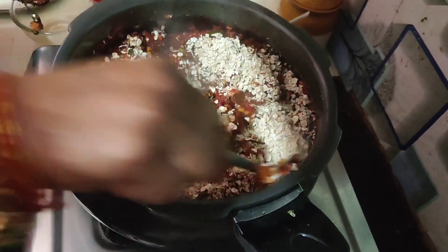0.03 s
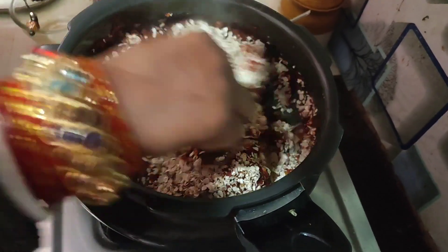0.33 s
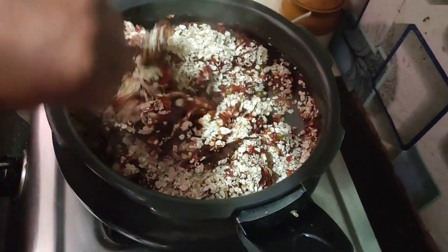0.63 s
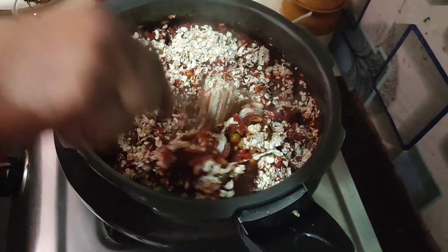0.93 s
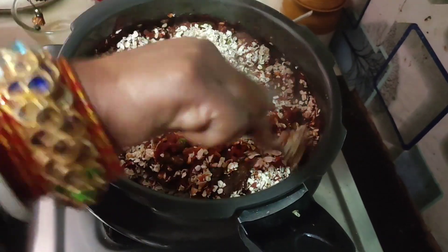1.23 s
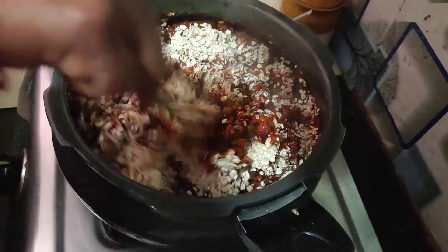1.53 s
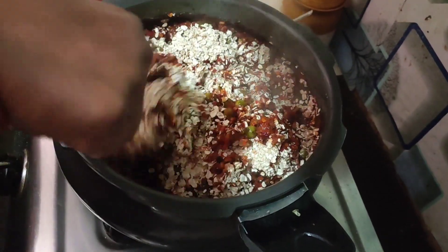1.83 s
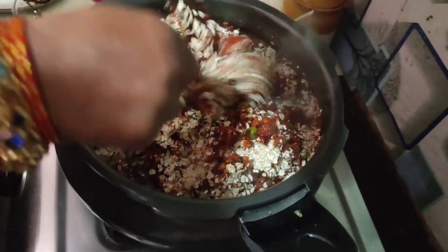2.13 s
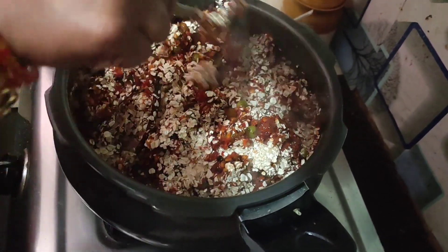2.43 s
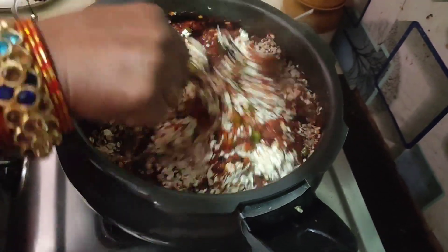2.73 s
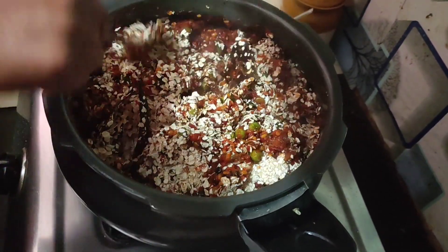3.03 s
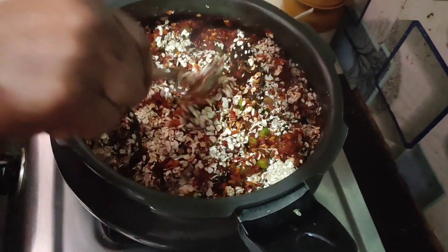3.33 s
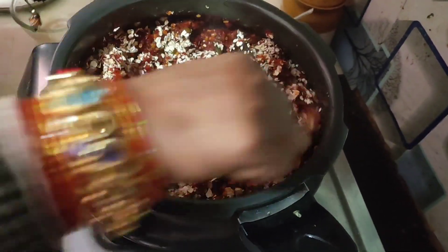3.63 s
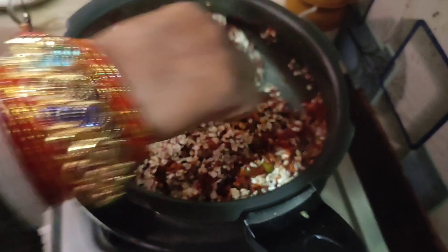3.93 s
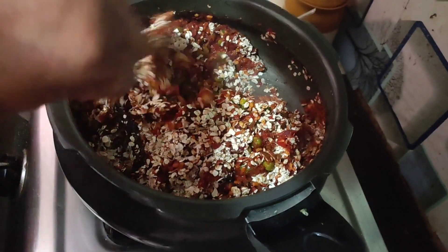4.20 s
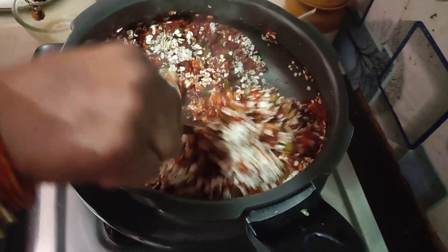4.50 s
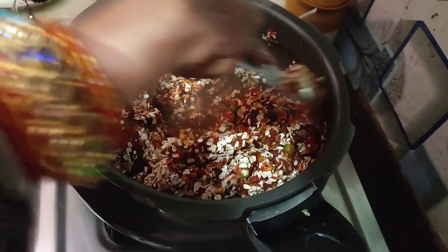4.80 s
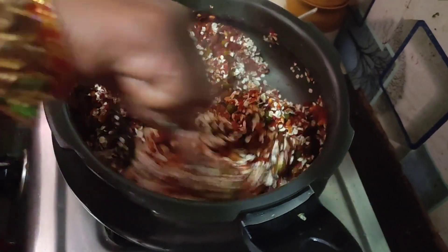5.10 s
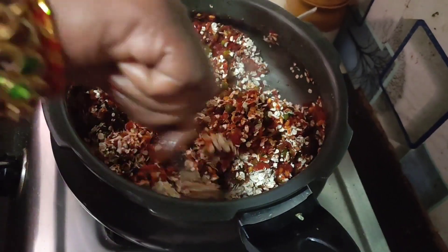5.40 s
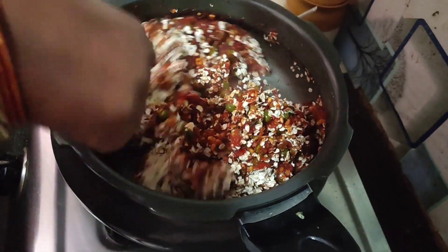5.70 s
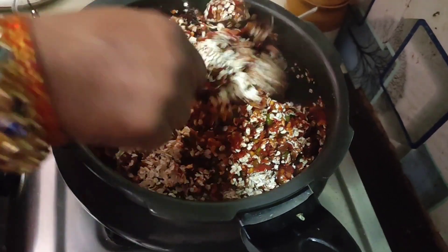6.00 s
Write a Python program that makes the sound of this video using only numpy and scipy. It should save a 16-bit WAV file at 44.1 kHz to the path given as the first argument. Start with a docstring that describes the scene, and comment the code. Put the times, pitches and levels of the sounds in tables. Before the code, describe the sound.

Close above a pot in a home kitchen, grainy food sizzles softly while a metal spoon turns it over. Bright, briefly ringing clinks and short, raspy scrapes come at uneven intervals, strongest at the start and just before two seconds. Duller knocks follow in the middle, then more clinks and a longer scrape near the end. A low rumble sits underneath.

```python
"""A steel spoon knocks and scrapes a heavy metal pot, turning thick, grainy food on a kitchen stove.
Each knock is a short clatter plus the ring of pot and spoon. Each scrape is fast stick-slip over the
bottom or wall, ringing both. Tiny bubbles sizzle faintly, swelling as wet food meets hot metal, over a
low kitchen rumble. Heard from close above the pot, with the right side facing in."""
import sys
import numpy as np
from scipy import signal
from scipy.fft import rfft, irfft
from scipy.io import wavfile

SR = 44100
rng = np.random.default_rng(int(sys.argv[2]) if len(sys.argv) > 2 else 0)


def dump(signal):
    """Clip the signal to [-1, 1] and save it as 16-bit WAV at the path in sys.argv[1]."""
    limited = np.clip(np.atleast_2d(signal).T, -1, 1)
    pcm = np.round(limited * 32767).astype(np.int16)
    wavfile.write(sys.argv[1], SR, pcm)


N = 271215
T = np.arange(N) / SR


def amp(db):
    return 10 ** (np.asarray(db) / 20)


def unit_rms(x):
    return x / np.sqrt(np.mean(x ** 2) + 1e-20)


def curve_at(points, hz):
    """Interpolate (freq_hz, value) points over log frequency."""
    freq_hz, value = np.transpose(points)
    return np.interp(np.log(hz + 1), np.log(freq_hz + 1), value)


def add(mix, start_s, sound):
    part = mix[..., max(round(start_s * SR), 0):][..., :sound.shape[-1]]
    part += sound[..., :part.shape[-1]]


def colour(x, points, size=4096):
    """Minimum-phase filter through (freq_hz, gain_db) points."""
    log_gain = np.log(amp(curve_at(points, abs(np.fft.fftfreq(size, 1 / SR)))) + 1e-6)
    taps = np.fft.ifft(np.exp(np.conj(signal.hilbert(log_gain)))).real
    return signal.fftconvolve(x, taps[:size // 2])[:len(x)]


def resonate(x, hz, width_hz):
    """Unity-gain resonance; hz may be a curve."""
    carrier = np.exp(2j * np.pi * np.cumsum(hz * np.ones(len(x))) / SR)
    pole = np.exp(-np.pi * width_hz / SR)
    return 2 * (carrier * signal.lfilter([1 - pole], [1, -pole], x / carrier)).real


def nearness(hz, note_hz, reach):
    """Bell curve over log frequency, 1 at the note."""
    return np.exp(-(np.log(hz / np.asarray(note_hz)) / reach) ** 2)


def waver(per_s):
    """Random drift, unit RMS."""
    return unit_rms(np.interp(T * per_s, np.arange(N), rng.standard_normal(N)))


def clicks(per_s, spread_db):
    """Random impulse train, a few of them large."""
    size = amp(spread_db * np.minimum(rng.exponential(1, N), 4))
    return unit_rms(size * rng.choice([-1, 1], N) * (rng.random(N) < per_s / SR))


def reflections(x, t60_s=0.09, size=4096):
    """Dense echoes off pot wall, stove and tiles."""
    echoes = rng.standard_normal(size) * amp(-60 * np.arange(size) / SR / t60_s)
    return signal.fftconvolve(x, echoes / np.linalg.norm(echoes))[:len(x)]


# Left side relative to right: freq_hz, gain_db
LEFT_SHADOW = [(60, 1), (110, -4), (250, -8), (420, -10), (700, -8.5), (1290, -14.5), (2380, -22),
               (4400, -28), (8000, -35.5), (14000, -18)]
# Likeness of the two sides: freq_hz, coherence
COHERENCE = [(30, .65), (100, .94), (300, .9), (700, .5), (1500, .3), (5000, .38), (14000, .35)]


def stereo(direct, diffuse, left_db, delay_samples=4):
    """Right gets the direct sound; left is shadowed, slightly late and partly diffuse."""
    size = 2 * len(direct)
    hz = np.fft.rfftfreq(size, 1 / SR)
    right, scatter = rfft([direct, diffuse], size)
    coherence = np.clip(curve_at(COHERENCE, hz), 0, 1)
    shadow = amp(np.minimum(curve_at(LEFT_SHADOW, hz) + left_db, 1))
    delay = np.exp(-2j * np.pi * hz * delay_samples / SR)
    left = shadow * (coherence * delay * right + np.sqrt(1 - coherence ** 2) * scatter)
    return irfft(np.array([left, right]) * 2 / (1 + shadow))[:, :len(direct)]


# Rumble round the stove: freq_hz, gain_db
RUMBLE_EQ = [(20, -9.5), (38, 2.5), (52, -6), (68, 0.5), (100, -13), (140, -8.5), (190, -26.5), (290, -9),
             (600, -49)]
# Kitchen hum: pitch_hz, width_hz, level_db
HUM_TONES = [(92.2, 22.3, -55), (123.1, 7.5, -61), (1104, 10.5, -69)]


def drone(rumble_db=-56):
    """Low rumble with wavering tones of narrow-band noise."""
    rumble = amp(rumble_db) * unit_rms(colour(rng.standard_normal(N), RUMBLE_EQ, size=16384))
    hum = np.zeros(N)
    for hz, width_hz, db in HUM_TONES:
        band = resonate(rng.standard_normal(N), hz, width_hz)
        hum += amp(db) * unit_rms(resonate(band, hz, width_hz))
    return rumble + hum


def kitchen(hiss_db=-75):
    """Drone from all round under faint white hiss."""
    return stereo(drone(), drone(), left_db=-1.6) + amp(hiss_db) * rng.standard_normal((2, N))


# Hollow modes of the pot: pitch_hz, level_db, t60_s
POT_MODES = [(115.8, -7.5, 1), (173.6, -0.5, 0.16), (262.3, 3, 0.54), (443, 4.5, 0.16), (586.6, -1.5, 0.44),
             (667, -2.5, 0.46), (712, 0, 0.3), (760.3, 6.5, 0.28), (936, 4, 0.28), (1060, 2.5, 0.28),
             (1340, -10.5, 0.13)]
# Dull rubbing in the pot: freq_hz, gain_db
GROAN_EQ = [(100, -30), (230, 2), (330, 0.5), (430, 1), (550, -1.5), (900, 0), (1300, 0), (2500, -56)]


def pot_groan(rubbing, ring_db=5):
    """Rubbing noise coloured by the hollow of the pot."""
    modes = sum(amp(db / 2) * resonate(rubbing, hz, 3.7 / t60_s + 8) for hz, db, t60_s in POT_MODES)
    return unit_rms(colour(rubbing + amp(ring_db) * modes, GROAN_EQ))


# Bursting bubbles: freq_hz, gain_db
SIZZLE_EQ = [(450, -18.5), (800, -2.5), (1000, -17.5), (1250, -6), (1500, -0.5), (2500, -5.5), (4000, -4),
             (4500, -0.5), (5400, -3.5), (6500, -3), (8700, -21), (14500, -18.5)]
# Wet food turned onto hot metal: peak_s, swell_db
FOOD_TURNS = [(0.05, 4), (0.45, 7), (0.85, 10.5), (1.22, 5.5), (1.5, 10.5), (2.18, 5.5), (2.78, 9.5),
              (3.22, 10.5), (3.97, 7), (4.481, 6), (5.3, 4), (5.95, 4.5)]


def frying(sizzle_db=-50.5, food_db=-62, half_turn_s=0.12, sizzle_share=0.38, drying_db_per_s=0.34):
    """Bubbles burst and food shifts; both swell at each turn. The sizzle fades as the food dries."""
    swell_db = sum(db * np.exp(-((T - peak_s) / half_turn_s) ** 2) for peak_s, db in FOOD_TURNS)
    flicker_db = 0.61 * waver(per_s=50)
    heat = amp(sizzle_db + sizzle_share * swell_db - drying_db_per_s * T + flicker_db)
    bubbles = heat * unit_rms(colour(clicks(per_s=12000, spread_db=2), SIZZLE_EQ))
    shifting = amp(food_db + swell_db) * pot_groan(rng.standard_normal(N))
    food = bubbles + shifting
    return stereo(food, reflections(food), left_db=3)


# Spoon and pot pressed together: pitch_hz, width_hz, level_db
PRESSED_MODES = [(958, 65, 1.5), (1707, 58, 4.5), (1906, 40, 3.5), (2970, 59, -0.5), (3360, 60, 1),
                 (3732, 47, 5), (4210, 43, 3), (4457, 64, 5), (4683, 74, 7.5), (5100, 96, 2),
                 (5590, 60, 4.5), (6090, 50, 5), (6470, 82, 0.5), (7440, 42, -2.5), (7400, 44, -11)]


def pressed_ring(slips, bend, grip_notes_hz, grip_db=7, damping_hz=8200):
    """Slips ring spoon and pot; modes near the notes of the grip are boosted."""
    ringing = np.zeros(len(slips))
    for hz, width_hz, db in PRESSED_MODES:
        boost_db = grip_db * nearness(hz, grip_notes_hz, reach=0.075).sum()
        ringing += amp(db + boost_db) * resonate(slips, hz * bend, width_hz)
    damping = signal.butter(8, damping_hz, fs=SR, output="sos")
    return unit_rms(signal.sosfilt(damping, ringing))


# Spoon edge dragging through grains: freq_hz, gain_db
RASP_EQ = [(300, -32), (700, -14), (950, -9), (1200, -7), (1800, 1.5), (2300, -0.5), (3000, 2.5),
           (4500, -3), (6400, -2), (7300, -20), (8200, -14), (9500, -28), (14000, -25)]
# Grains being crushed: freq_hz, gain_db
FIZZ_EQ = [(5000, -6), (7400, 1), (8250, 4), (9000, -2.5), (10000, -0.5), (12200, -1), (12850, 8),
           (13400, -4), (14100, -1), (14600, -6)]
# Strokes over bottom or wall:
# start_s, length_s, pressure_db, rise_db, groan_db, fizz_db, grip_low_hz, grip_high_hz
SPOON_STROKES = [(0.172, 0.14, -36, 8, -48, -58, 2990, 5230),
                 (0.278, 0.033, -37, 11, -39, -34.5, 2990, 4230),
                 (0.308, 0.067, -48, 3, -43.5, -66, 1800, 5080),
                 (0.391, 0.014, -40, 3, -51, -40.5, 4200, 6130),
                 (0.538, 0.014, -39.5, -2, -64, -47, 4660, 6550),
                 (0.876, 0.045, -27.5, 3.5, -54, -53, 1630, 6950),
                 (1.841, 0.22, -28, 6, -47.5, -51.5, 4620, 6420),
                 (3.74, 0.056, -40.5, 10, -55, -60, 1720, 4440),
                 (3.785, 0.05, -37, -2, -45, -50, 4360, 5600), (3.834, 0.049, -35, 6, -50, -67, 1720, 3760),
                 (4.507, 0.053, -28, 2, -47, -53, 1630, 4100),
                 (5.018, 0.086, -36, 13.5, -40, -53.5, 950, 4100),
                 (5.138, 0.073, -34.5, -1, -41, -49.5, 950, 4100),
                 (5.468, 0.065, -33.5, 13.5, -42.5, -59, 1820, 2970),
                 (5.538, 0.14, -37.5, 5, -41.5, -64, 1820, 4500),
                 (5.64, 0.24, -28.5, 1.5, -52.5, -50, 3740, 4700),
                 (5.797, 0.018, -28.5, 2, -54, -62, 4620, 4650)]


def spoon_scrapes(metal_trim_db=-2.5, groan_trim_db=-1, ring_db=9, bite_s=0.018, release_t60_s=0.15,
                  arch_db=5.5, fizz_arch_db=9.5, groan_fade_db_per_s=57):
    """The edge catches and slips very fast, on grains and on metal. A stroke bites, swells, lets go."""
    judder = amp(0.76 * waver(per_s=140))
    crushing, slips = (clicks(per_s=6000, spread_db=2.5) * judder for _ in range(2))
    rasp = colour(crushing, RASP_EQ)
    fizz = unit_rms(colour(crushing, FIZZ_EQ))
    groan = pot_groan(slips)
    bend = 1 + 0.008 * waver(per_s=60)  # the spoon rocks on the grains
    out = np.zeros(N)
    for start_s, length_s, pressure_db, rise_db, groan_db, fizz_db, *grip_notes_hz in SPOON_STROKES:
        span = (T > start_s) & (T < start_s + length_s + release_t60_s)
        t = T[span] - start_s
        along = np.minimum(t / length_s, 1) - 0.5
        ends = (2 * along) ** 2  # 0 mid-stroke, 1 at either end
        contact = np.minimum(t / bite_s, 1) * amp(-60 * np.maximum(t - length_s, 0) / release_t60_s)
        ringing = pressed_ring(slips[span], bend[span], grip_notes_hz)
        metal = unit_rms(unit_rms(rasp[span]) + amp(ring_db) * ringing)
        metal_gain = amp(metal_trim_db + pressure_db + rise_db * along - arch_db * ends)
        groan_gain = amp(groan_trim_db + groan_db - groan_fade_db_per_s * t)
        fizz_gain = amp(fizz_db - fizz_arch_db * ends)
        out[span] += contact * (metal_gain * metal + groan_gain * groan[span] + fizz_gain * fizz[span])
    return stereo(out, reflections(out), left_db=-2)


# Spoon-on-pot contact: freq_hz, gain_db
CONTACT_EQ = [(60, -47), (165, -15), (255, -4), (335, -12.5), (430, -2), (520, -9), (900, -2.5),
              (1300, -2.5), (1850, 8), (2500, -1), (2960, 11), (3700, 2), (4150, 14.5), (4950, 14),
              (5500, 8), (6400, 15.5), (7600, 4), (13000, -6)]


def clatter(t, t60_s, notes_hz, crack_db=-7, crack_s=0.0012, bass_extra_s=0.13,
            room_db=-30, room_t60_s=0.97):
    """Contact noise: a crack, damped treble, lingering bass and the kitchen's tail."""
    noise = rng.standard_normal(len(t))
    bass = signal.sosfilt(signal.butter(2, 900, fs=SR, output="sos"), noise)
    burst = (noise - bass) * (amp(-60 * t / t60_s) + amp(crack_db) * np.exp(-t / crack_s))
    burst += bass * amp(-60 * t / (t60_s + bass_extra_s))
    burst += rng.standard_normal(len(t)) * amp(room_db - 60 * t / room_t60_s)
    burst += sum(resonate(burst, hz, width_hz=0.13 * hz) for hz in notes_hz)
    return colour(burst, CONTACT_EQ)


def struck_ring(modes, t, note_hz, boost_db, reach):
    """Decaying modes, boosted near the note of the struck spot."""
    out = np.zeros(len(t))
    for hz, db, t60_s in modes:
        level_db = db + boost_db * nearness(hz, note_hz, reach) + rng.normal(0, 1)
        out += amp(level_db - 60 * t / t60_s) * np.sin(2 * np.pi * (hz * t + rng.random()))
    return out


# Limits of the thud, body, clack, clink and tick bands: edge_hz
BAND_EDGES_HZ = [150, 400, 1000, 2500, 7500, 14000]


def balance_knock(blow, thud_db, clack_db, clink_db, low_hz, lift_db=3, attack_samples=882):
    """Equalise a blow so its attack nears the band levels; the band of its low note is lifted."""
    body_db = thud_db + 0.14 * (clink_db - thud_db) + 2.5
    tick_db = clink_db - 25
    lifts_db = lift_db * np.histogram([low_hz], BAND_EDGES_HZ)[0]
    wanted_db = np.array([thud_db, body_db, clack_db, clink_db, tick_db]) + lifts_db
    hz, power = signal.periodogram(blow[:attack_samples], SR, scaling="spectrum")
    attack_db = 10 * np.log10(np.histogram(hz, BAND_EDGES_HZ, weights=power)[0] + 1e-15)
    centres_hz = np.sqrt(np.multiply(BAND_EDGES_HZ[:-1], BAND_EDGES_HZ[1:]))
    return colour(blow, np.transpose([centres_hz, wanted_db - attack_db]))


# Bright modes of the spoon: pitch_hz, level_db, t60_s
SPOON_MODES = [(1706, -3, 0.22), (1860, -2, 0.32), (2260, -6, 0.23), (2988, -4, 0.47), (4110, 0.5, 0.36),
               (4160, -8, 0.38), (4500, -6, 0.28), (4930, -9, 0.35), (4950, 0.5, 0.3), (6540, -2, 0.17),
               (7100, 6, 0.12), (8672, 2, 0.095)]
# Knocks, each with the two notes its spot favours:
# start_s, thud_db, clack_db, clink_db, low_hz, high_hz, contact_t60_s, spoon_ring_db, left_db
SPOON_KNOCKS = [(0.0814, -42.5, -33, -14.5, 1124, 5300, 0.067, -7, 10.5),
                (0.2222, -44, -39.5, -31, 409, 5000, 0.088, -21, 0),
                (0.2812, -40.5, -31.5, -26.5, 642, 2860, 0.071, -22, 2),
                (1.408, -55.5, -48.5, -34, 283, 3200, 0.12, -8, -4),
                (1.7276, -45.5, -25, -22, 610, 2988, 0.074, -10, 5.5),
                (1.8434, -51.5, -38, -46, 615, 4660, 0.021, -26, -1),
                (2.63, -44, -47.5, -51, 650, 4570, 0.19, -15, 0),
                (2.66, -50, -64, -64, 700, 4538, 0.12, -17, -5),
                (2.825, -49.5, -44, -47, 284, 2760, 0.6, -17, -3),
                (2.905, -25.5, -28.5, -44.5, 260, 2720, 0.25, -22, 1),
                (2.966, -35.5, -44, -60, 730, 2960, 0.11, -20, -2),
                (3.616, -40.5, -49.5, -53.5, 607, 4923, 0.22, -15, 0),
                (3.657, -50.5, -51, -72, 680, 4923, 0.1, -15, 2),
                (3.737, -52.5, -38.5, -35.5, 500, 5116, 0.066, -4, -1),
                (4.5133, -52.5, -38.5, -29.5, 1050, 4207, 0.062, -9, -4),
                (4.925, -53.5, -70, -72, 430, 4340, 0.11, -15, -1),
                (4.985, -39.5, -32.5, -27.5, 424, 4400, 0.056, -5, 0),
                (5.234, -55.5, -51.5, -37, 252, 6270, 0.064, -1, -3),
                (5.4517, -38.5, -30, -21, 248, 4180, 0.05, -2.5, -2.5)]


def spoon_knocks(trim_db=-1, pot_db=-32, spoon_db=-15, rise_s=0.00068):
    """Each blow sets off a clatter, the hollow of the pot and the free ring of the spoon."""
    out = np.zeros((2, N))
    t = np.arange(SR) / SR
    for start_s, thud_db, clack_db, clink_db, low_hz, high_hz, t60_s, ring_db, left_db in SPOON_KNOCKS:
        blow = clatter(t, t60_s, (low_hz, high_hz))
        blow += amp(pot_db) * struck_ring(POT_MODES, t, low_hz, boost_db=13.5, reach=0.061)
        blow += amp(spoon_db + ring_db) * struck_ring(SPOON_MODES, t, high_hz, boost_db=4, reach=0.075)
        blow *= 1 - np.exp(-t / rise_s)
        blow = amp(trim_db) * balance_knock(blow, thud_db, clack_db, clink_db, low_hz)
        add(out, start_s, stereo(blow, reflections(blow), left_db))
    return out


def scene():
    return spoon_knocks() + spoon_scrapes() + frying() + kitchen()


def record(dry):
    """Low-pass at 14.5 kHz."""
    taps = signal.firwin(511, 14500, window=("kaiser", 8), fs=SR)
    return signal.oaconvolve(dry, taps[None], "same", axes=1)


dry = scene()
out = record(dry)
dump(out)
```